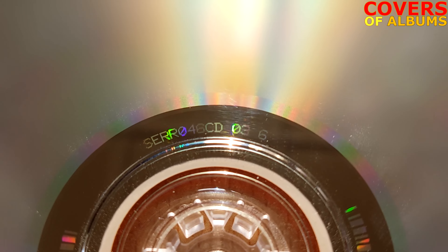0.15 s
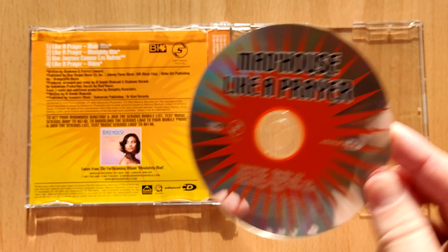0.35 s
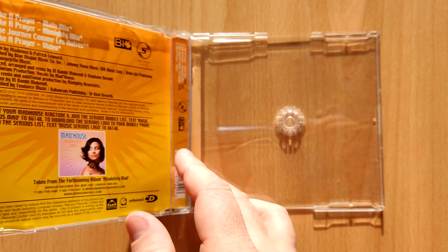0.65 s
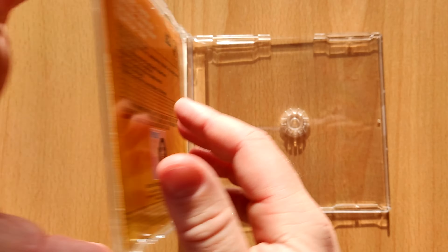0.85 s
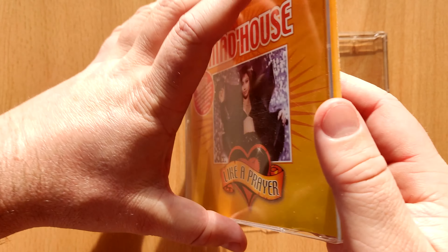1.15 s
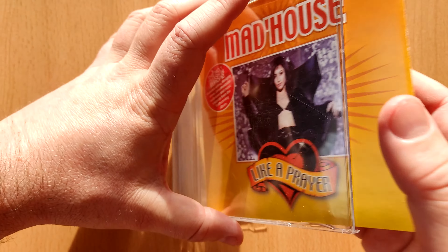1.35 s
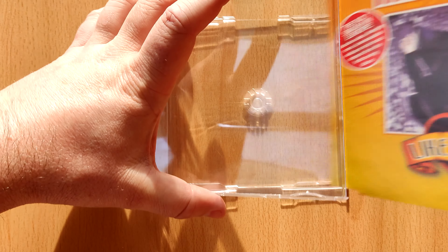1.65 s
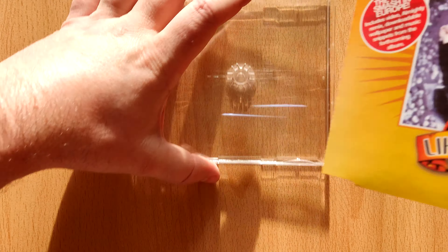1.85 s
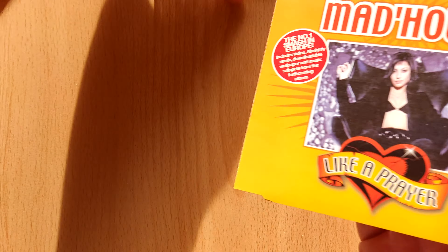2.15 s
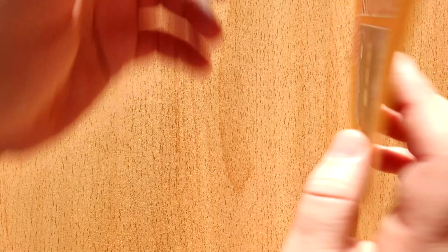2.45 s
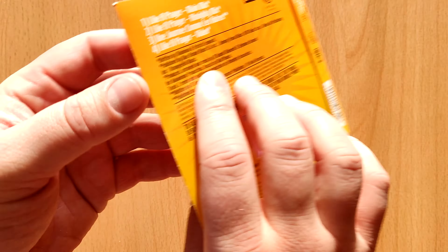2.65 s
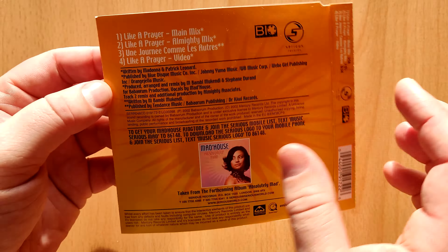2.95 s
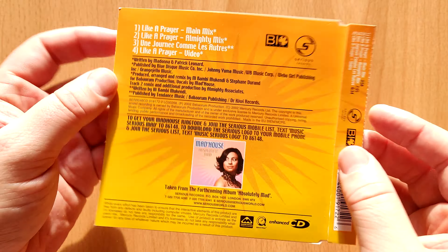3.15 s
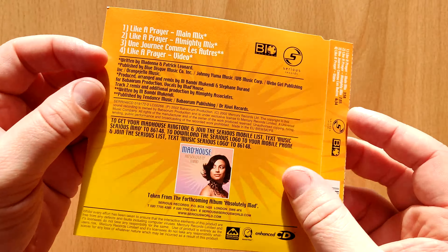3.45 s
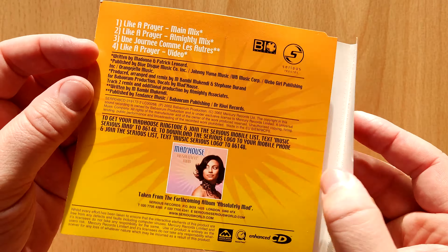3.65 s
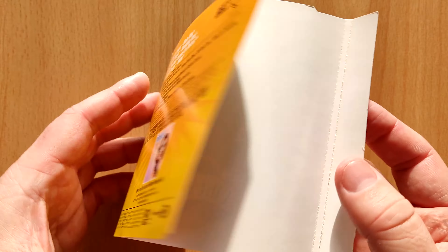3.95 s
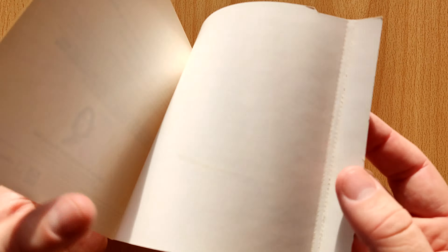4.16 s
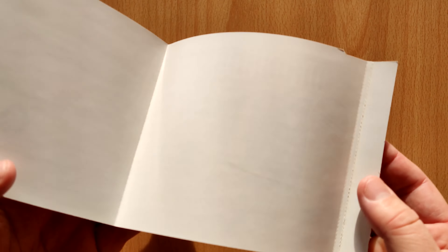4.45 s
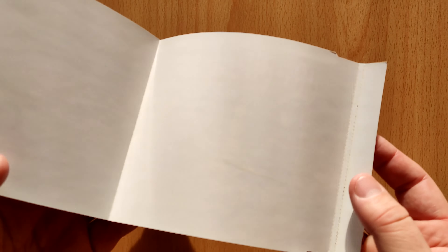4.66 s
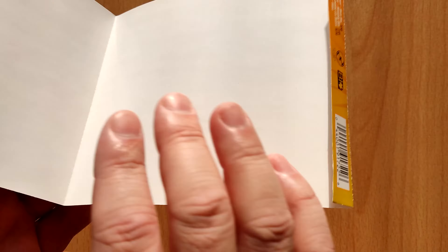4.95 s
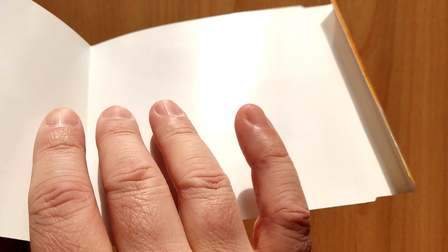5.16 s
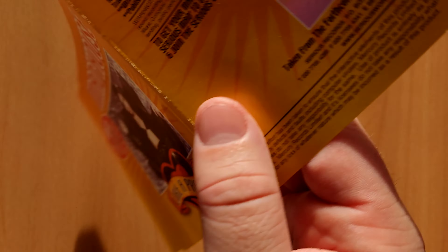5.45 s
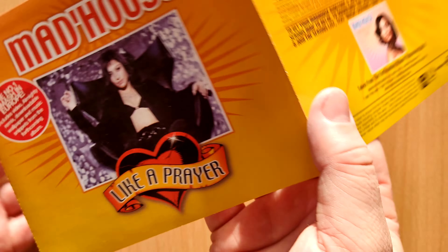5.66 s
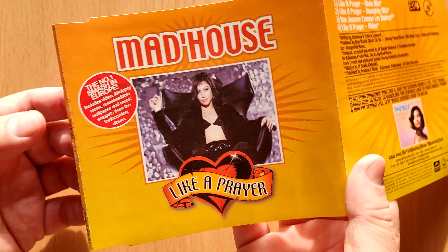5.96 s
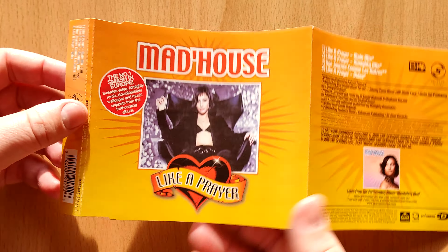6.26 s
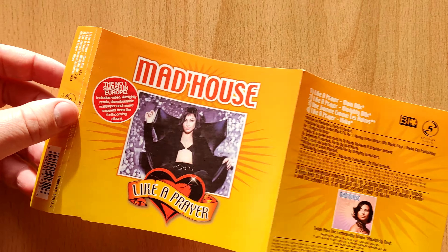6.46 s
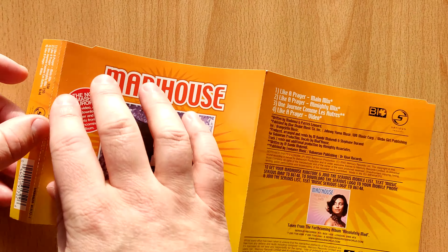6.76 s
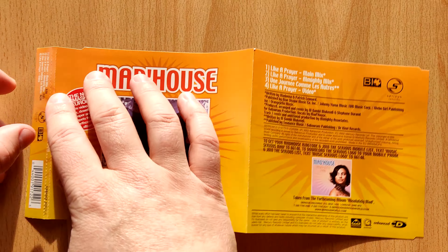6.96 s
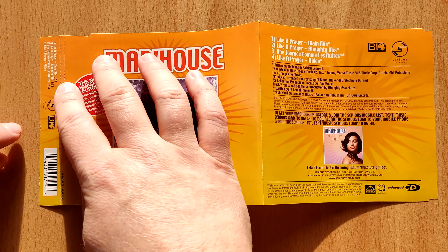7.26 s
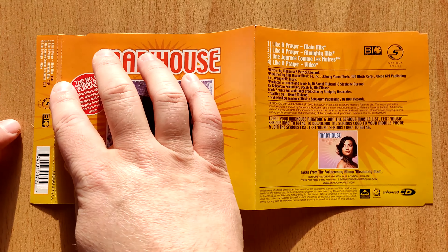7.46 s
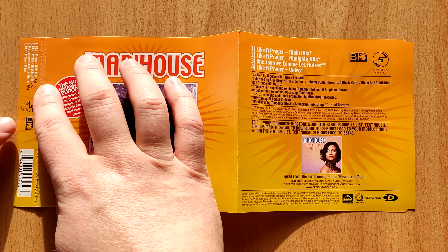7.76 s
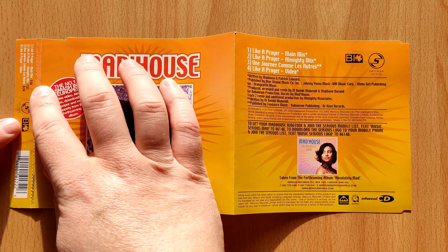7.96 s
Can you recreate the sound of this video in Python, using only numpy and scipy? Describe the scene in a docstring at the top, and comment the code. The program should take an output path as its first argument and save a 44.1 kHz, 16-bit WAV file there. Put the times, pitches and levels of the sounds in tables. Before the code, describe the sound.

A small dry room with steady soft hiss, heard closely by two spaced microphones. After near quiet, a faint tick at 0.4 s and light plastic scraping around 0.6 s; a click at 1.0 and hollow scuffs follow. From 1.6 to 2.3 s the scraping peaks, hissy and ringing, with a rising squeal at 1.7 and a thin high squeak near 2.1, then stops. Dense dry snaps crackle at 2.7-2.9 s, with scattered crease clicks over gentle rustling until 3.9. At 4.2 the sheet opens with buckling pops and low flaps. Rubs and a strong snap come around 5.2-5.3, then floppy turns and dull air puffs to 5.9. Creases click at 6.0-6.3, leading into a loud bright swish at 6.3-6.4. One hard, broad slap cracks at 7.0, the loudest event, then smooth, silky rubbing continues to 8.1 s.

```python
"""Hands slide a folded paper inlay out of a thin plastic case: scraped noise rings the shell, edges squeal.
A push over the wooden table closes the scrapes. Then the inlay is turned and unfolded: creases snap as
short bursts, panels buckle at their own pitch, the sheet flaps as sagging low tones. Laid on the table
it is rubbed with smooth hiss, brightest near 9 kHz, and one slap cracks the fold flat. A small quiet
room, two spaced microphones with steady hiss that falls gently toward the treble."""
import sys
import numpy as np
from scipy import signal
from scipy.fft import rfft, irfft, next_fast_len
from scipy.io import wavfile
from scipy.ndimage import uniform_filter1d, map_coordinates

SR = 44100
rng = np.random.default_rng(int(sys.argv[2]) if len(sys.argv) > 2 else 0)


def wav_record(signal):
    """Record a signal, one row per channel, as 16-bit PCM in the file named by sys.argv[1]."""
    frames = np.transpose(np.atleast_2d(signal))
    bounded = np.clip(frames, -1, 1)
    # unit amplitude maps onto the largest positive 16-bit level
    quanta = np.round(bounded * 32767).astype(np.int16)
    wavfile.write(sys.argv[1], SR, quanta)


N = 357024
TIME_S = np.arange(N) / SR

# microphone hiss colour: pitch_hz, relative_level_db (per Hz)
MIC_HISS = [(7.1, -47), (12, -1), (48, -21.5), (102, -27.5), (196, -30), (537, -38.5), (1200, -44),
            (14500, -49)]
# colour difference of the two microphones: pitch_hz, left_minus_right_db
MIC_COLOUR = [(200, 0), (700, -2.5), (1280, 2.5), (2400, -3), (4300, -0.5), (8000, -10), (11000, 5.5),
              (14800, 4)]
# likeness of left and right: pitch_hz, likeness (0 to 1)
LIKENESS = [(200, 1), (1000, 0.58), (2200, 0.22), (4000, 0.042), (12000, 0.1)]
# decay of the room: pitch_hz, t60_s
ROOM_DECAY = [(200, 0.22), (2000, 0.16), (10000, 0.16)]
# air stirred by the hands: time_s, level_db
STIRRED_AIR = [(2.5, -74), (4.2, -71), (4.7, -75.5), (5.2, -61.5), (5.5, -55.5), (5.62, -66), (5.8, -58.5),
               (6, -68.5), (6.6, -67.5)]
# position of the hands: time_s, left_minus_right_db
HAND_PLACE = [(.5, 1), (1.5, 3), (3.8, 0.5), (4.3, -0.5), (5.7, 1), (8.09, 3.5)]
# flaps of the sheet that push air: start_s, level_db, flutter_hz, t60_s
FLAPS = [(1.667, -43, 133, 0.057), (4.218, -37.5, 255, 0.053), (4.251, -35, 115, 0.027),
         (4.802, -47, 238, 0.26), (4.802, -42.5, 106, 0.054), (5.321, -36, 72.7, 0.044),
         (5.476, -45, 217, 0.061), (5.761, -38.5, 100, 0.094), (6.405, -42.5, 141, 0.098),
         (7.029, -43.5, 245, 0.065)]
# friction hiss colour: pitch_hz, relative_level_db (per Hz)
GLOSS_COLOUR = [(1760, -18), (3000, -2.5), (3530, 0), (5640, -1), (7210, 1), (8660, 8.5), (9850, 3.5),
                (11200, 4.5), (14500, -13.5), (14800, -101)]
# upper modes of the loose case: pitch_hz, width_hz, relative_level_db
UPPER_MODES = [(1460, 47, 11), (2200, 270, 2), (2700, 170, 1.5), (3240, 37, 7.5), (4265, 46, 5),
               (5550, 90, 5), (6330, 52, 3.5)]
# upper modes of the case pressed on the wood: pitch_hz, width_hz, relative_level_db
PRESSED_MODES = [(1240, 180, -8.5), (1590, 230, -8), (1980, 113, -4), (2700, 140, -4.5)]
# middle modes of the case: pitch_hz, width_hz, relative_level_db
MIDDLE_MODES = [(732, 64, 7.5), (922, 116, 7.5), (1156, 430, 3)]
# lowest modes of the case: pitch_hz, width_hz, relative_level_db
LOWEST_MODES = [(267, 51, 9), (410, 80, 5)]
# strokes that scrape the case: fastest_s, speeding_up_s, slowing_down_s,
# hiss_db, upper_modes_db, middle_modes_db, lowest_modes_db
CASE_STROKES = [(0.576, 0.014, 0.15, -44.5, -47, -51.5, -61), (0.67, 0.11, 0.11, -46, -51.5, -49.5, -56.5),
                (0.8, 0.079, 0.096, -63.5, -73, -68.5, -59), (0.955, 0.044, 0.086, -72, -80, -64, -58),
                (1.012, 0.026, 0.16, -52.5, -62.5, -67, -57), (1.27, 0.075, 0.27, -47.5, -80, -54, -48),
                (1.5, 0.3, 0.44, -48.5, -87, -61.5, -73), (1.67, 0.16, 0.12, -30.5, -68, -55, -59.5),
                (1.77, 0.22, 0.1, -48.5, -41.5, -45, -74),
                (1.885, 0.024, 0.076, -43.5, -40.5, -54.5, -61.5),
                (1.955, 0.0099, 0.025, -44.5, -42, -58, -64), (1.99, 0.031, 0.3, -43.5, -39, -53, -68),
                (2.11, 0.12, 0.11, -29, -37, -57, -86), (2.23, 0.18, 0.12, -31.5, -40.5, -70, -89),
                (2.268, 0.051, 0.089, -28, -31.5, -47, -60.5), (2.33, 0.058, 0.093, -38, -40, -47, -67)]
# rough narrow tones of an edge that sticks and slips, climbing as the free strip shortens:
# start_s, length_s, level_db, first_pitch_hz, rise_hz_per_s
SQUEALS = [(1.689, 0.17, -46.5, 986, 2220), (2.084, .16, -43, 8550, 302), (3.135, 0.063, -60, 1252, 4000),
           (5.03, 0.13, -64, 6080, 300), (5.193, .08, -58, 6220, 300)]
# modes of the sheet in the air: pitch_hz, width_hz, relative_level_db
AIR_SHEET_MODES = [(690, 470, -2.5), (1310, 410, 3.5), (1610, 410, 2), (2150, 450, 0.5), (3170, 620, -9.5)]
# modes of the sheet on the table: pitch_hz, width_hz, relative_level_db
FLAT_SHEET_MODES = [(1200, 350, 1.5), (1450, 245, 9), (2100, 440, 1), (3480, 180, -1)]
# strokes of fingers and table on the sheet: fastest_s, speeding_up_s, slowing_down_s,
# hiss_db, sheet_tone_db
SHEET_STROKES = [(2.76, 0.095, 0.26, -59, -64.5), (2.93, 0.06, 0.3, -69, -81),
                 (3.19, 0.084, 0.23, -56, -71.5), (3.61, 0.28, 0.33, -58, -65.5),
                 (4.0, 0.24, 0.38, -62.5, -68.5), (4.24, 0.03, 0.042, -49, -40),
                 (4.385, 0.055, 0.084, -53, -58), (4.47, 0.035, 0.027, -61, -63.5),
                 (4.75, 0.081, 0.17, -58.5, -64), (4.975, 0.042, 0.058, -51, -55),
                 (5.17, 0.22, 0.071, -52, -57.5), (5.238, 0.059, 0.052, -46.5, -49.5),
                 (5.258, 0.013, 0.0088, -40, -47.5), (5.34, 0.03, 0.024, -44, -39.5),
                 (5.663, 0.0093, 0.047, -53.5, -50), (5.885, 0.016, 0.092, -54, -51.5),
                 (6.03, 0.072, 0.11, -67.5, -61.5), (6.16, 0.044, 0.062, -53.5, -46.5),
                 (6.283, 0.094, 0.054, -37.5, -40.5), (6.367, 0.067, 0.031, -31.5, -40.5),
                 (6.41, 0.081, 0.044, -46.5, -45.5), (6.47, 0.036, 0.19, -57.5, -62.5),
                 (6.64, 0.059, 0.059, -58.5, -64.5), (6.735, 0.051, 0.024, -54.5, -60.5),
                 (7.0, 0.089, 0.18, -47, -58.5), (7.15, 0.87, 0.32, -52.5, -65.5),
                 (7.57, 0.21, 0.26, -53.5, -66), (7.86, 0.13, 0.12, -54.5, -69),
                 (8.09, 0.082, .05, -51, -62.5)]
# creases and edges that snap: start_s, crack_db (before its colour), buckling_tone_db, buckling_tone_hz
SNAPS = [(0.3705, -53.5, -77, 536), (0.9998, -40.5, -59, 713), (1.3836, -39.5, -62, 900),
         (1.5013, -54, -40, 830), (1.874, -57, -50, 1660), (1.951, -35.5, -42, 1500),
         (2.7221, -36, -56, 790), (2.7278, -29, -46, 950), (2.877, -31.5, -31.5, 990),
         (2.882, -34, -35.5, 980), (2.8944, -47, -46, 900), (2.9028, -37, -39, 1670),
         (2.9064, -24, -38, 814), (2.909, -32, -38, 880), (2.9118, -45, -46, 1000),
         (3.0738, -29.5, -39.5, 800), (3.0838, -54, -49, 900), (3.108, -50, -65, 1000),
         (3.1599, -38.5, -36, 1190), (3.1657, -33.5, -59, 1430), (3.1757, -40, -46, 1210),
         (3.2557, -58, -43.5, 764), (3.3524, -46.5, -55, 1100), (3.3837, -33, -39.5, 1150),
         (3.493, -40, -50.5, 650), (3.7696, -40.5, -49, 1090), (3.774, -49, -41.5, 730),
         (3.855, -45, -55, 1290), (4.162, -50, -48, 1040), (4.217, -37, -41, 1090), (4.952, -43, -37, 955),
         (5.026, -46, -40, 960), (5.3239, -31, -26.5, 850), (5.407, -52, -39, 1500),
         (5.468, -46.5, -37.5, 940), (5.659, -55, -51, 700), (5.8715, -54, -37.5, 1050),
         (6.016, -53, -42, 940), (6.142, -41, -42, 1330), (6.1449, -38.5, -34, 1140),
         (6.197, -43.5, -44, 1180), (6.277, -46, -30.5, 1410)]
# colour of a crack: pitch_hz, gain_db
CRACK_COLOUR = [(1290, 12.5), (2200, 8), (3520, 11), (6200, 15.5), (8560, 23.5), (10100, 15.5),
                (11100, 20.5), (13800, 8), (15200, -25)]
# panels that bend through without a crack: start_s, peak_db, pitch_hz, rattle_s
BUCKLES = [(3.079, -40.5, 820, 0.0046), (3.942, -47, 3360, 0.0079), (4.02, -44, 3620, 0.017),
           (4.227, -26, 1030, 0.019), (4.2498, -24.5, 710, 0.0093), (4.249, -43, 3080, 0.012),
           (4.26, -21.5, 1340, 0.0038), (5.2923, -40.5, 650, 0.021), (5.4174, -34, 790, 0.012),
           (5.472, -38, 635, 0.01), (5.494, -41.5, 560, 0.018), (5.7615, -35.5, 690, 0.018),
           (5.79, -47, 510, 0.071), (5.903, -33.5, 910, 0.015)]
# the fold touches, cracks flat on the wood and rebounds: start_s, level_db (before its colour)
SLAP_BLOWS = [(7.0229, -24.5), (7.0274, -9), (7.0296, -21.5)]
# colour of the slap: pitch_hz, gain_db
SLAP_COLOUR = [(88, -49), (150, -12), (600, -6.5), (1530, 1.5), (2120, -4.5), (3570, 5.5), (6130, -7),
               (8520, 3), (9940, -1.5), (13800, -8), (15200, -53)]

HISS_DB, HISS_TOP_HZ, TOP_HZ = -54.5, 14450, 15400  # microphone hiss; band limits of the hiss and of all
PRESSED_S, LAID_S = 2.24, 6.2  # the hand presses the case down; the sheet comes to rest on the table
GRIP = 2.3  # friction grows as the speed to this power
SQUEAL_WIDTH = 0.08  # width of the tone over its pitch
SNAP_LIKENESS = 0.72  # a snap comes from one spot, so both ports hear nearly the same
# small ticks: a boost of the stroke's gain, where 0 dB adds as much again
CRINKLES_PER_S, CRINKLE_DB, CRINKLE_SPREAD_DB, CRINKLE_T60_S = 60, 0, 3.5, 0.012


def amp(db):
    """dB to gain."""
    return 10 ** (np.asarray(db) / 20)


def fade(t, t60):
    """Exponential decay that loses 60 dB in t60 seconds."""
    return amp(-60 * t / t60)


def unit(x):
    """Scaled to rms 1."""
    return x / np.sqrt(np.mean(x ** 2) + 1e-20)


def along(points, hz):
    """Reads a curve of (Hz, value) points on a log frequency axis."""
    f, v = np.transpose(points)
    return np.interp(np.log(hz + 1), np.log(f + 1), v)


def wobble(rate):
    """A smooth random curve, rate knots a second."""
    knots = rng.standard_normal(int(N * rate / SR) + 4)
    return map_coordinates(knots, [np.arange(N) * rate / SR])


def filtered(x, response):
    """Shapes x by a complex response of frequency."""
    m = next_fast_len(x.shape[-1] + 8192)
    spectrum = rfft(x, m) * response(np.fft.rfftfreq(m, 1 / SR))
    return irfft(spectrum, m)[..., :x.shape[-1]]


def coloured(x, points):
    """Shapes x by a curve of (Hz, dB) points."""
    return filtered(x, lambda hz: amp(along(points, hz)))


def modes(table):
    """The causal response of a set of resonances with alternating signs."""
    def response(f):
        total = 0
        for k, (centre, width, db) in enumerate(table):
            drag = 1j * f * width
            total = total + (-1) ** k * amp(db) * drag / (centre * centre - f * f + drag)
        return total
    return response


def ports(pair, lag, least=0):
    """Mixes two unrelated signals to the ports' likeness, at least least; left hears lag seconds later."""
    def spread(hz):
        turn = np.arccos(np.clip(along(LIKENESS, hz), least, 1)) / 2
        return np.array([np.cos(turn), np.sin(turn)])
    mid, side = filtered(pair, spread)
    shift = lambda hz: np.exp(np.outer([-1j, 1j], np.pi * hz * lag))
    return filtered(np.array([mid + side, mid - side]), shift)


def strokes(rows):
    """One gain curve per level column: a stroke's speed rises and falls as a quarter sine."""
    powers = np.zeros((len(rows[0]) - 3, N))
    for s, rise, fall, *dbs in rows:
        at = slice(max(round((s - rise) * SR), 0), round((s + fall) * SR))
        away = TIME_S[at] - s
        speed = np.cos(np.pi / 2 * np.clip(away / np.where(away < 0, rise, fall), -1, 1))
        powers[:, at] += np.outer(amp(dbs), np.abs(speed) ** GRIP) ** 2
    return np.sqrt(powers)


def friction(grain_db, burst_db, patchy_db, lag, size):
    """Tiny slips: noise jumping in size and in bursts; grip shifts its colour in patches (bands, moments)."""
    z = signal.stft(rng.standard_normal((2, N)), nperseg=256)[2]
    field = uniform_filter1d(rng.standard_normal(z.shape[1:]), size=size[0], axis=0)
    field = uniform_filter1d(field, size=size[1], axis=1)
    slips = signal.istft(z * amp(patchy_db * unit(field)), nperseg=256)[1][:, :N]
    jumps = amp(grain_db * wobble(900) + burst_db * wobble(70))
    return ports(jumps * slips, lag)


def room(x):
    """The walls answer with a noise tail in which each frequency dies at its own speed."""
    hz, t, z = signal.stft(rng.standard_normal((2, SR // 3)), SR, nperseg=256)
    tail = signal.istft(z * fade(t, along(ROOM_DECAY, hz)[:, None]), SR, nperseg=256)[1]
    delayed = np.pad(x, ((0, 0), (150, 0)))  # samples
    return signal.fftconvolve(delayed, tail / np.linalg.norm(tail[0]), axes=1)[:, :N]


def sway():
    """Moving hands and paper stir a low rumble that both ports share."""
    gusts = amp(0.99 * wobble(18)) * rng.standard_normal(N)
    air = unit(filtered(gusts, modes([(88.0, 67, 0)])))
    time_s, level_db = np.transpose(STIRRED_AIR)
    return amp(np.interp(TIME_S, time_s, level_db, -120, -120)) * air


def flaps():
    """A flap pushes air: a flutter that sags in pitch as the sheet slackens, and a dull puff."""
    air, t = np.zeros(N + SR), np.arange(SR // 4) / SR
    hollow = modes([(277, 660, 0.011)])
    onset = 1 - np.exp(-t / 0.00019)
    for s, db, hz, t60 in FLAPS:
        flutter = np.sin(2 * np.pi * hz * (t + 0.001 * (1 - np.exp(-t / 0.014))))
        dull = filtered(rng.standard_normal(len(t)), lambda f: hollow(f) ** 2)
        puff = 3.3 * fade(t, 0.72) * dull
        air[round(s * SR):][:len(t)] += amp(db) * fade(t, t60) * (flutter + puff) * onset
    return air[:N]


def case():
    """Scraping hisses in narrow ridges and rings the modes of the plastic shell."""
    hiss, upper, middle, lowest = strokes(CASE_STROKES)
    slips = friction(grain_db=1.5, burst_db=2.3, patchy_db=3.5, lag=0.00002, size=(1, 20))
    ring = lambda table: unit(filtered(slips, modes(table)))
    pressed = np.clip((TIME_S - PRESSED_S) / 0.016, 0, 1)
    shell = (1 - pressed) * ring(UPPER_MODES) + pressed * ring(PRESSED_MODES)
    edge = unit(coloured(slips, GLOSS_COLOUR))
    return hiss * edge + upper * shell + middle * ring(MIDDLE_MODES) + lowest * ring(LOWEST_MODES)


def squeal():
    """A sticking edge sings: each tone swells and fades, size and phase shaking as fast as it is wide."""
    out = np.zeros(N)
    for s, length, db, hz, rise in SQUEALS:
        t = np.clip(TIME_S - s, 0, length)
        phase = 2 * np.pi * (hz + rise * t / 2) * t
        shake = SQUEAL_WIDTH * hz
        tone = wobble(shake) * np.sin(phase) + wobble(shake) * np.cos(phase)
        swell = np.sqrt(np.abs(np.sin(np.pi * t / length))) * (t < length)
        out += amp(db) * swell * tone
    return out


def sheet(x):
    """The sheet's modes, with a new set of mostly narrower modes once it lies on the table."""
    flat = np.clip((TIME_S - LAID_S) / 0.014, 0, 1)
    return (1 - flat) * filtered(x, modes(AIR_SHEET_MODES)) + flat * filtered(x, modes(FLAT_SHEET_MODES))


def crinkles():
    """Small folds tick at random while the sheet is in the air: a gain curve of short spikes."""
    sizes = amp(CRINKLE_DB + CRINKLE_SPREAD_DB * rng.standard_normal(N))
    ticks = (rng.random(N) < CRINKLES_PER_S / SR) * sizes
    spike = fade(np.arange(SR // 50) / SR, CRINKLE_T60_S)
    return signal.fftconvolve(ticks * (TIME_S < LAID_S), spike)[:N]


def rubbing():
    """Skin and wood drag over the gloss and shake the sheet."""
    hiss, tone = strokes(SHEET_STROKES)
    slips = friction(grain_db=1.0, burst_db=1.6, patchy_db=3.2, lag=0.00019, size=(3, 14))
    slips = slips * (1 + crinkles())
    return hiss * unit(coloured(slips, GLOSS_COLOUR)) + tone * unit(sheet(slips))


def panel(shake, hz):
    """A buckling panel rings at its own pitch and an overtone, with little far from them; peak 1."""
    body = modes([(hz, 0.69 * hz, 0), (2.6 * hz, 0.48 * hz, -9)])
    ring = filtered(shake, lambda f: body(f) ** 2)
    return ring / np.abs(ring).max()


def snaps():
    """A crease cracks for a few ms and its panel rings longer; other panels rattle without a crack."""
    crack, tone = np.zeros((2, N + SR)), np.zeros((2, N + SR))
    t = np.arange(SR // 10) / SR
    for s, crack_db, tone_db, hz in SNAPS:
        burst = rng.standard_normal((2, len(t))) * (1 - np.exp(-t / 0.0011))
        at = slice(round(s * SR), round(s * SR) + len(t))
        crack[:, at] += amp(crack_db) * burst * (fade(t, 0.006) + 0.07 * fade(t, 0.03))
        tone[:, at] += amp(tone_db) * panel(burst * fade(t, 0.054), hz)
    for s, db, hz, rattle in BUCKLES:
        shake = rng.standard_normal((2, len(t))) * fade(np.maximum(t - rattle, 0), 0.038)
        tone[:, round(s * SR):][:, :len(t)] += amp(db) * panel(shake, hz)
    both = coloured(crack[:, :N], CRACK_COLOUR) + tone[:, :N]
    return ports(both, lag=0.000205, least=SNAP_LIKENESS)


def slap():
    """The hand presses the stiff fold down: noise blows fuse into one hard broad crack."""
    blows = np.zeros(N)
    for s, db in SLAP_BLOWS:
        blows += amp(db) * fade(np.abs(TIME_S - s), 0.018) * (TIME_S >= s)
    return ports(coloured(blows * rng.standard_normal((2, N)), SLAP_COLOUR), lag=0.00016)


def scene():
    """Case and paper, near and moving from side to side, in the room."""
    pan_db = np.interp(TIME_S, *np.transpose(HAND_PLACE))
    handled = case() + squeal() + rubbing() + snaps() + slap()
    near = handled * amp(np.array([pan_db, -pan_db]) / 2) + flaps()
    return near + amp(-8.0) * room(near) + sway()


def record(dry):
    """Each microphone has its own colour and hiss; nothing is kept above the band limit."""
    noise = rng.standard_normal((2, N))
    hiss = filtered(noise, lambda hz: amp(along(MIC_HISS, hz)) * (hz < HISS_TOP_HZ))
    heard = filtered(dry, lambda hz: amp(np.outer([0.5, -0.5], along(MIC_COLOUR, hz))))
    return filtered(heard + amp(HISS_DB) * unit(hiss), lambda hz: hz < TOP_HZ)


dry = scene()
out = record(dry)
wav_record(out)
```